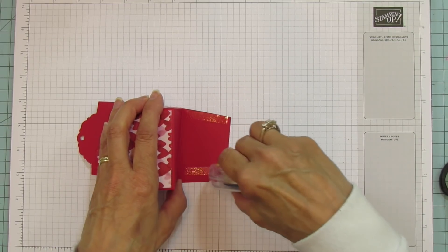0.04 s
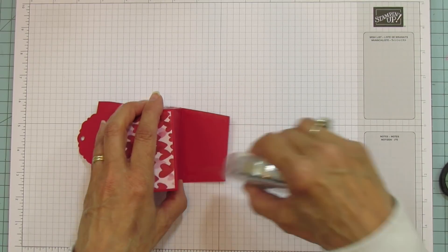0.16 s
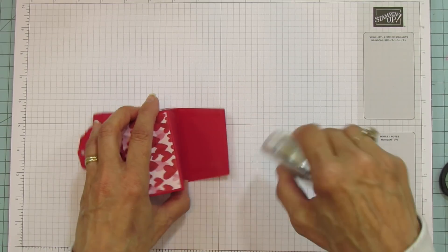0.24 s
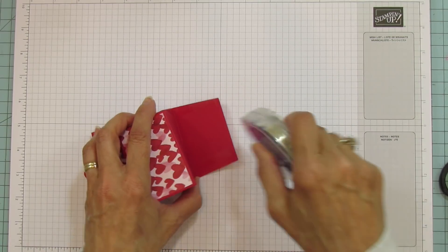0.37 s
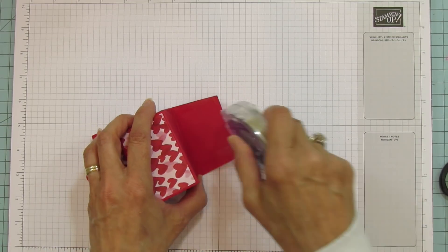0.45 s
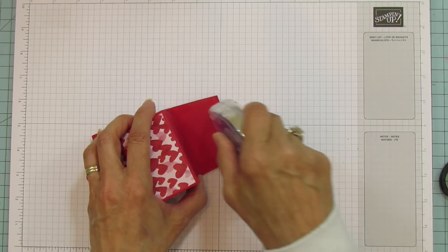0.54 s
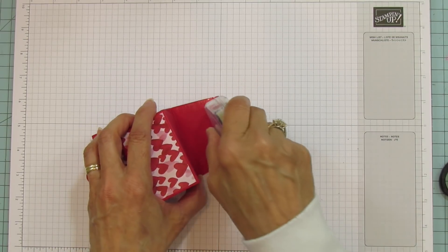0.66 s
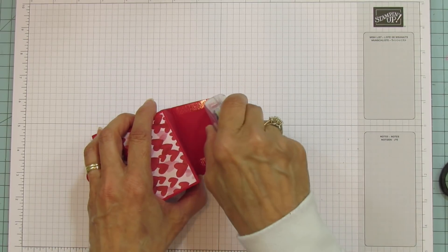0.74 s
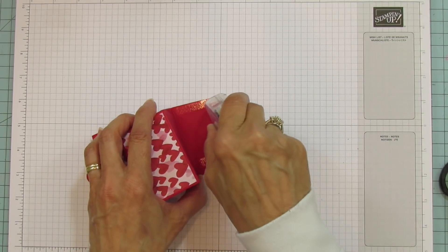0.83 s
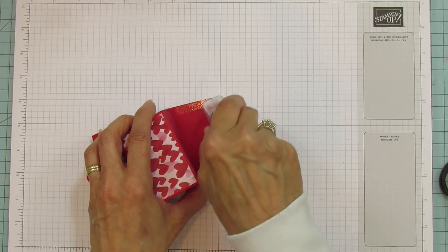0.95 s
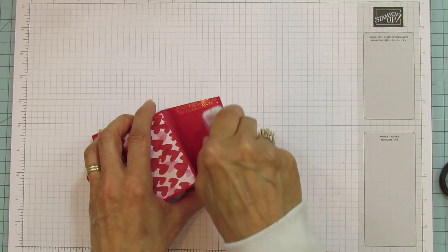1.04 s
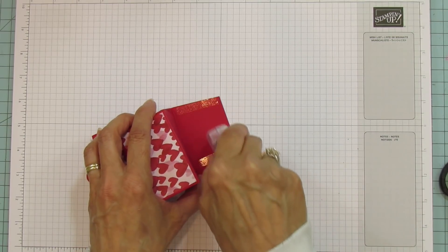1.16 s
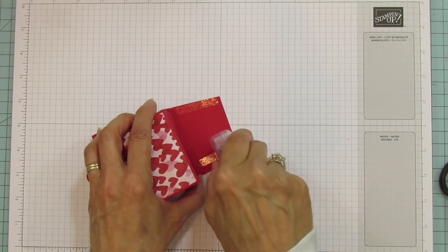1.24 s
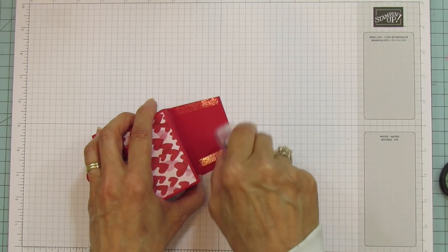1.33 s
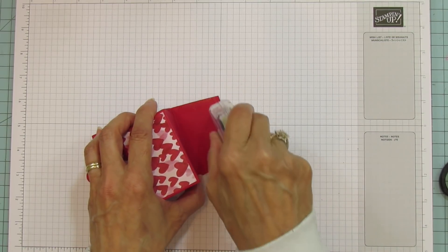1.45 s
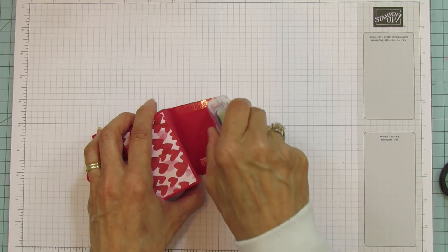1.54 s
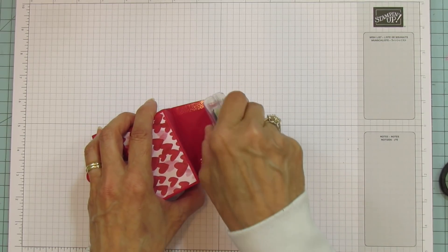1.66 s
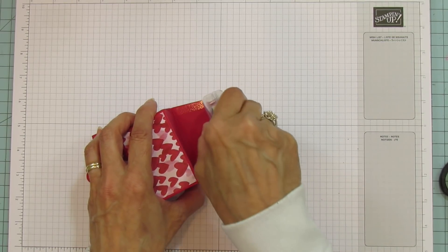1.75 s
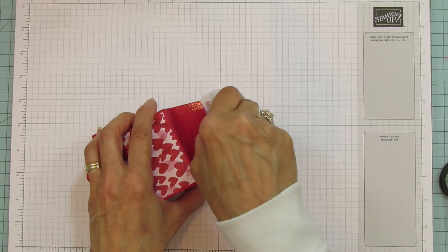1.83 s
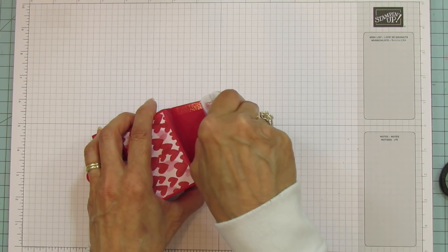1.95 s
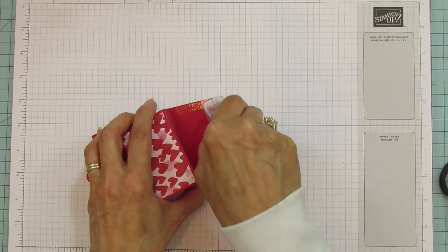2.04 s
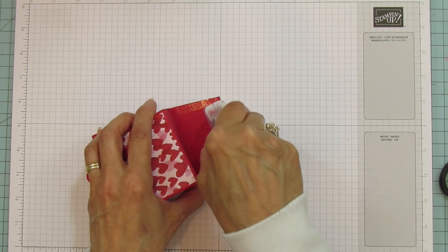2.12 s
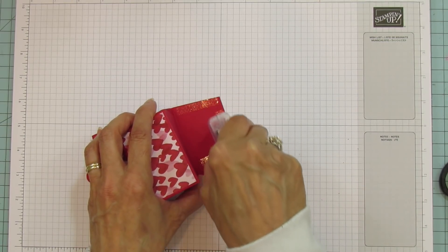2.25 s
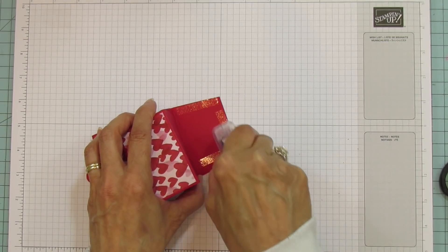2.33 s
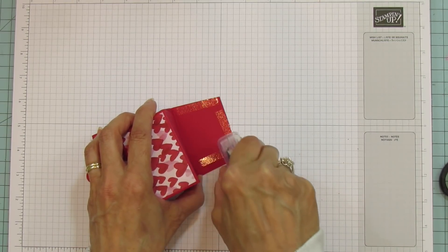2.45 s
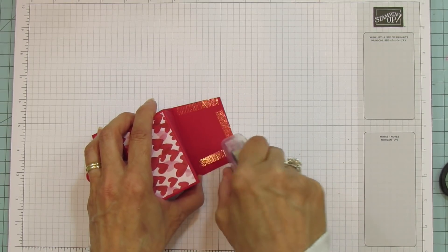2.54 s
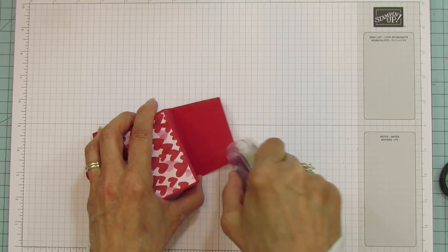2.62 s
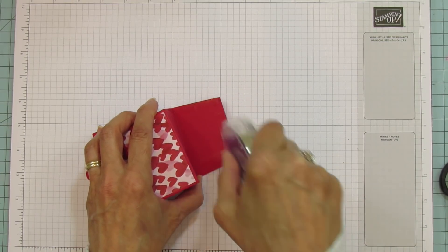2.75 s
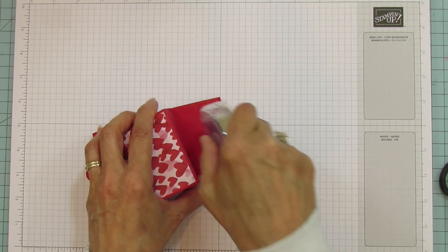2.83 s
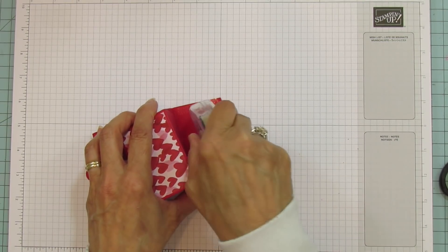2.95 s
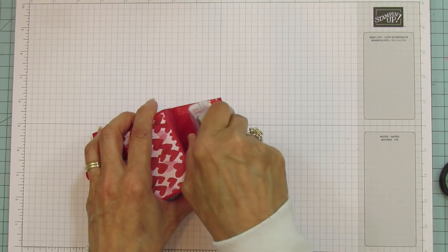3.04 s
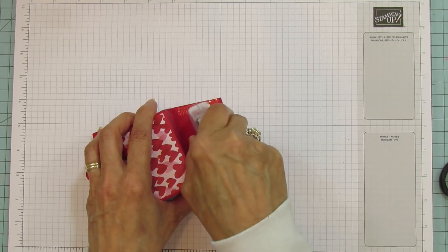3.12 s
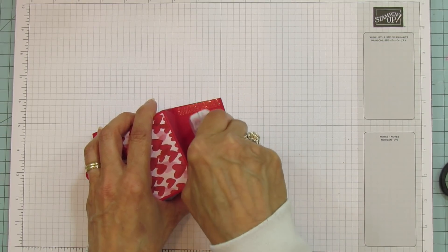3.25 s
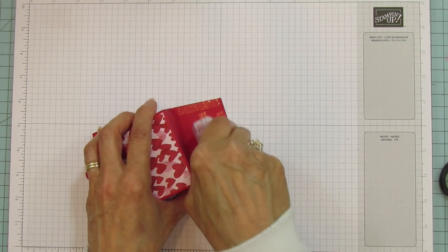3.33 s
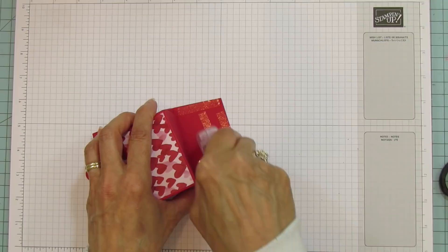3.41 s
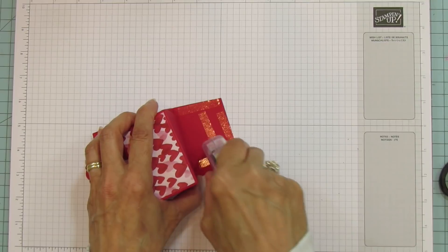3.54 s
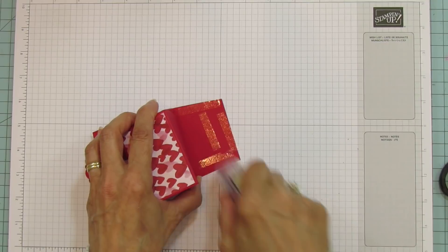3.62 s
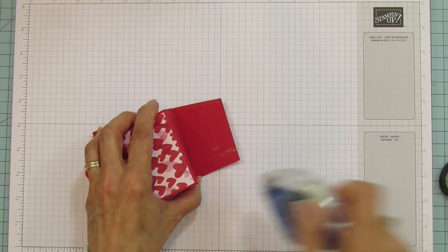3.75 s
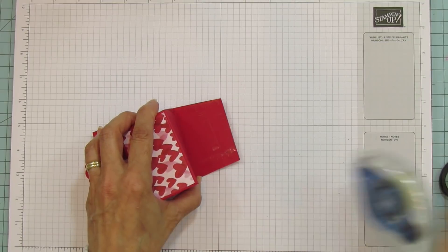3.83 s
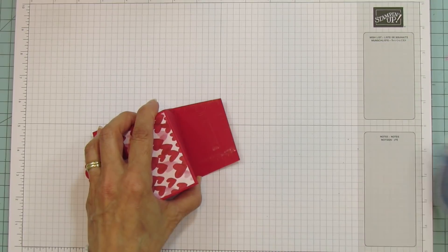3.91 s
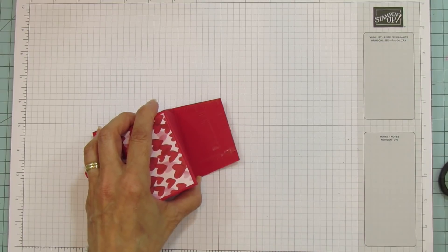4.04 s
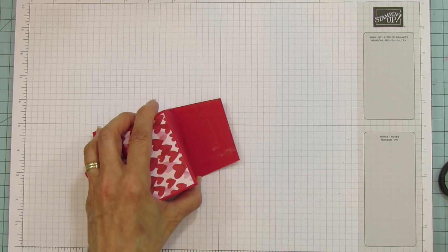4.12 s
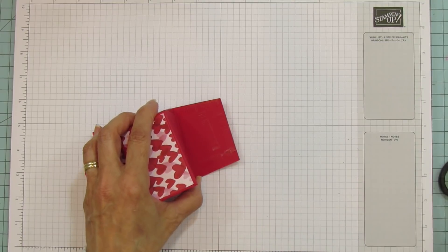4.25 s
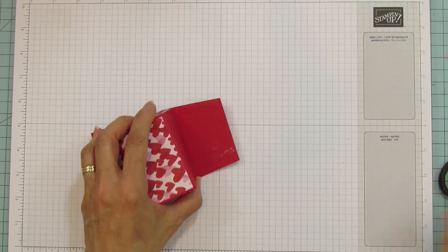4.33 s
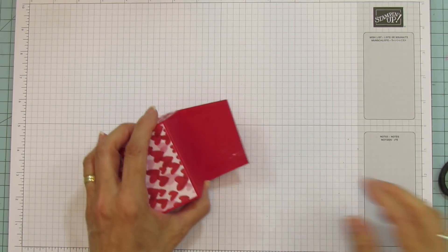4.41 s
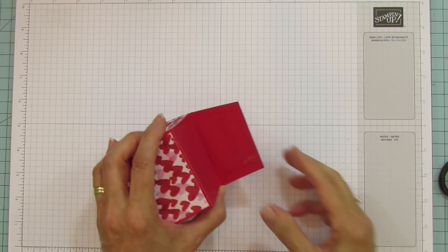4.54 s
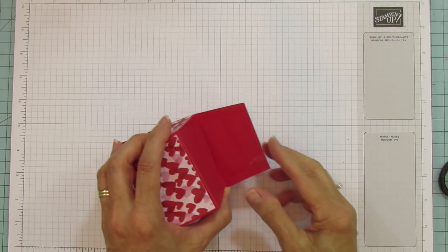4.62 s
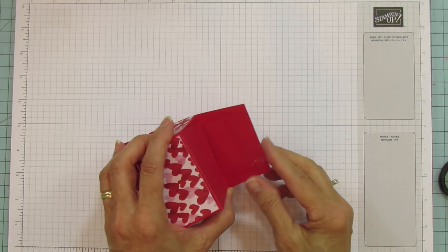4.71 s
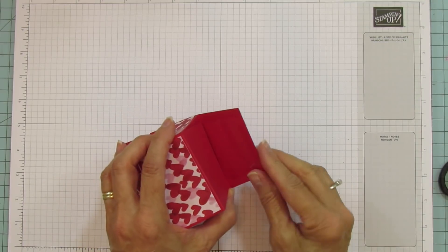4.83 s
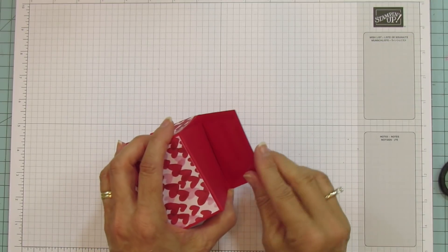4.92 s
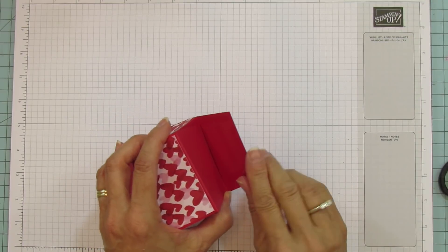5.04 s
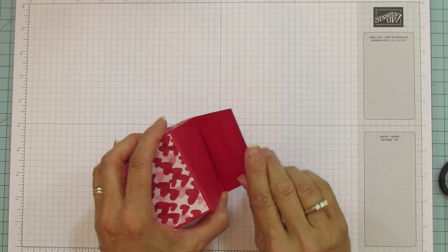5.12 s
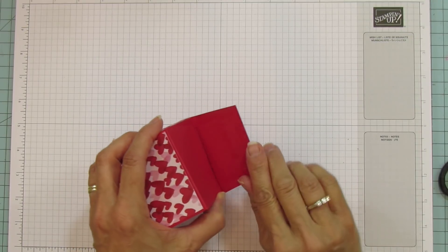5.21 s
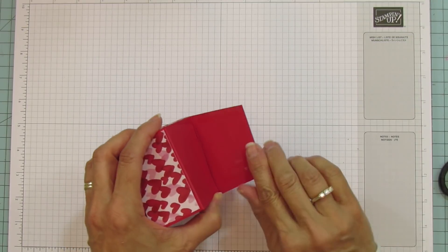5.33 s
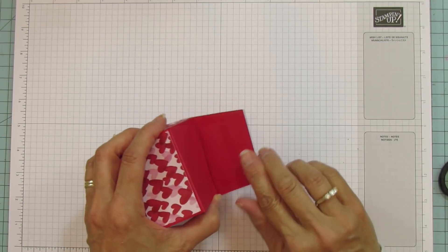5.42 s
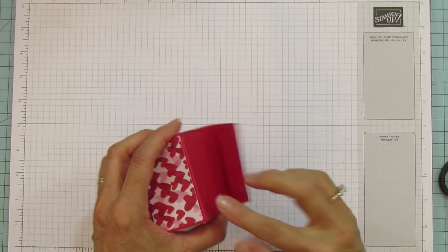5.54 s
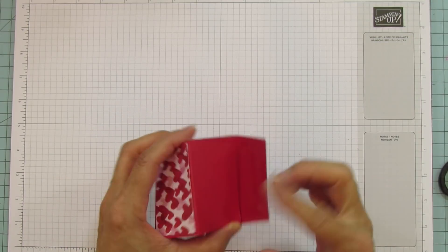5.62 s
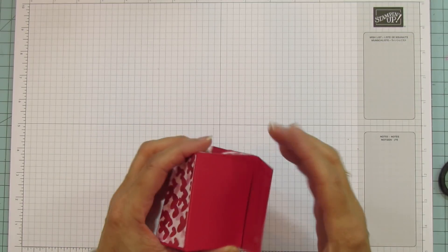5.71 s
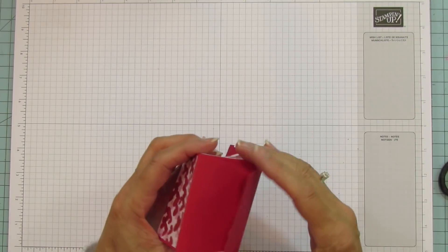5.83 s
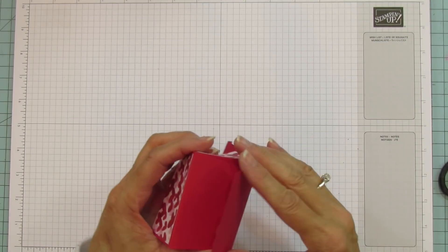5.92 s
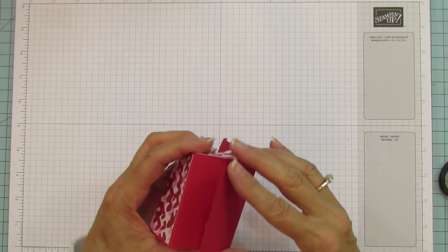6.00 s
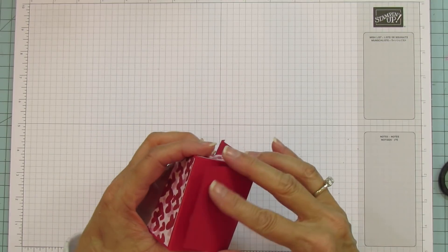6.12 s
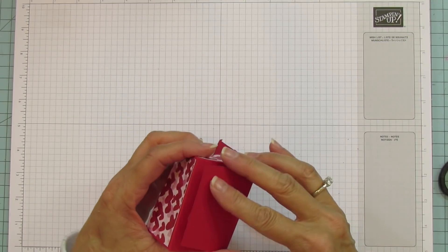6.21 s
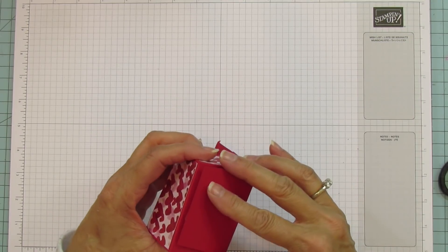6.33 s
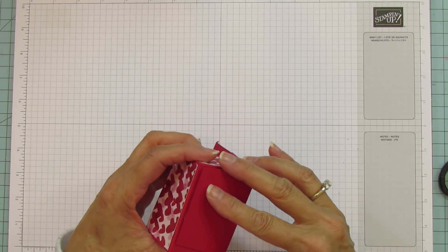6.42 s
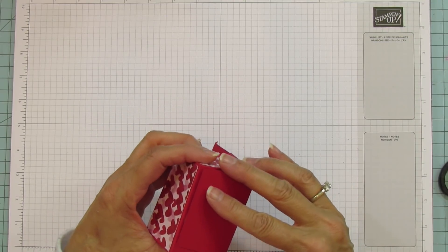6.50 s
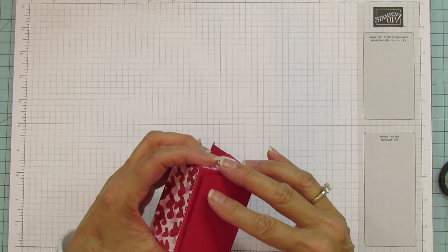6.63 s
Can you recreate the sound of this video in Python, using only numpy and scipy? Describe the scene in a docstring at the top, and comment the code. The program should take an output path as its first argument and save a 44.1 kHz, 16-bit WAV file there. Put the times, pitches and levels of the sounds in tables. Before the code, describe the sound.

Close above a craft table in a small room, a plastic tape runner slides, taps the card and ticks lightly as it rolls in short strokes. It is put down with a sharp, hard clatter that rattles briefly. Then fingers brush stiff card, which pops, flutters and creaks as it is folded and pressed. Steady wide hiss with a faint hollow hum lies behind.

```python
"""A plastic tape runner lays glue on a cardstock flap under a camera in a small room: its head knocks on the
card, its case ticks as it rolls, then it drops and clatters to rest (coloured noise bursts, case modes).
The flap is folded and pressed with snaps and rustles (bursts, trains of fibre slips through filters).
Landings thud on the table (decaying modes); steady wide hiss and two narrow bands lie behind (noise)."""
import sys
import numpy as np
from scipy import signal
from scipy.fft import rfft, irfft
from scipy.io import wavfile
from scipy.ndimage import uniform_filter1d, map_coordinates

SR = 44100
rng = np.random.default_rng(int(sys.argv[2]) if len(sys.argv) > 2 else 0)


def int16_out(signal):
    """Quantize to a 16-bit WAV file."""
    q = np.round(np.clip(np.atleast_2d(signal).T, -1, 1) * 32767)
    wavfile.write(sys.argv[1], SR, q.astype(np.int16))


N = 294011

# runner head set down on card and table: t/s, level/dB, bass/dB, ring f/Hz
TAPS = [(.468, 7.5, 2.5, 915), (.9303, -3.5, 0, 2510), (.9922, 0.5, 9, 2850), (1.03, 2, 9, 910)]
# spectrum of a tap: f/Hz, level/dB
TAP_COLOUR = [(80, -41), (220, -24), (350, -19), (450, -5), (540, 0.5), (700, -8.5), (1000, -13.5),
              (1500, -13.5), (2900, -20), (4500, -27.5), (9000, -32), (14000, -38)]
TAP_SCUFF_S, TAP_TREBLE_DB, TAP_RING_DB = 0.00096, 2, 8.5

# runner ticks, dull from the case, bright where the tape snaps off: t/s, level/dB, treble/dB, ring f/Hz
CLICKS = [(.763, -17.5, -5, 1930), (1.522, -15, -2, 3320), (2.047, -20, -4, 2000), (2.1133, -5.5, 2.5, 825),
          (2.358, -13.5, 11.5, 3060), (2.436, -14, 9, 3000), (2.45, -3.5, 11.5, 7100),
          (2.642, -12, 4.5, 1350), (2.6762, -2, 1, 1100), (3.001, -15.5, -10, 525), (3.045, -15, -11, 1940),
          (3.21, -18, -13, 2250), (3.492, -10, -14, 2050), (3.654, -9, 5, 525), (3.6705, -3, 10, 2050),
          (3.765, -13, -10, 2660), (3.85, -15, -4.5, 3000)]
# spectrum of a tick: f/Hz, level/dB
CLICK_COLOUR = [(100, -19.5), (300, -12), (550, -3), (1000, -7), (1700, -5), (2400, -2), (3200, -6.5),
                (4200, -13), (6500, -16), (9000, -23.5), (12500, -13.5), (15000, -22)]
# scuff and bass at 0 dB treble; a brighter tick is thinner and tears for longer
CLICK_SCUFF_0_S, CLICK_BASS_0_DB, CLICK_RING_DB = 0.0014, 2.5, 10
CLICK_BASS_LOSS_DB_PER_DB, PEEL_STRETCH_DB_PER_DB = 0.5, 0.13
# a faint burst of the same tone ahead of each tick softens its onset; level re tick
LEAD_IN_S, LEAD_IN_DB = .004, -16
# the tape squeaks once as the runner lifts off:
# t/s, level/dB, bass/dB, treble/dB, scuff time/s, ring f/Hz, ring/dB
SQUEAK = (.1712, -4.5, 0, 3.5, .0028, 3180, 15)

# the runner's spools turn: start t/s, end t/s, level/dB
ROLLS = [(.738, 1.398, -71), (1.978, 2.078, -66.5), (2.281, 2.475, -60.5), (2.599, 2.71, -61.5),
         (2.986, 3.34, -70.5), (3.363, 3.54, -59), (3.578, 3.73, -58.5)]
# spools whirr and the case hums along; levels re roll
SPOOL_HZ, SPOOL_HISS_DB, HOLLOW_HZ, HOLLOW_DB = 2030, -7, 540, -1.5
# faint ticks while rolling; mean level re roll
GEAR_TICKS_PER_S, GEAR_TICK_DB, GEAR_SPREAD_DB, GEAR_TREBLE_DB = 16, 41.5, 1.5, -6

# dropped runner bounces and tips over: t/s, level/dB, bass/dB, treble/dB, ring f/Hz
CLATTER = [(3.9562, 8.5, 11.5, -17, 1100), (3.9584, 15, 12, 1.5, 1464), (3.985, 9, -5.5, -6, 1530),
           (3.993, 16, 2.5, 10.5, 910), (4.0342, 16.5, -9, 2, 1520), (4.0443, 18, -4.5, -6, 1600),
           (4.0559, 12.5, -12.5, 1, 2280), (4.074, 20.5, -2, -1, 1930), (4.0857, 13.5, -11, 10, 5000),
           (4.3138, 7, -6.5, -10, 1097), (4.3196, 7.5, -6, -4.5, 2340)]
# spectrum of a clatter blow: f/Hz, level/dB
CLATTER_COLOUR = [(50, -40), (90, -24), (130, -14), (250, -10.5), (370, -4.5), (520, -0.5), (900, 0),
                  (1200, -2), (1500, -2.5), (1900, -2), (2600, -3), (4000, -8), (5200, -11.5), (8500, -14),
                  (12500, -16.5), (15000, -21.5)]
# scuff at 0 dB bass: a flat, bassy blow is brief, a thin, glancing one scrapes longer
CLATTER_SCUFF_0_S, CLATTER_RING_DB, GLANCE_DB_PER_DB = .0012, 10.5, 0.54
# chatter as it settles on a side: first t/s, first level/dB, bass/dB, time between rebounds/s
CHATTERS = [(4.0887, 20.5, -5, .012), (4.182, 8, -19, .009), (4.343, -1.5, 3.5, .023)]
CHATTER_FALL_DB, CHATTER_SCUFF_S, CHATTER_TREBLE_DB = 5, 0.0034, -3
CHATTER_RING_HZ, CHATTER_RING_DB = 590, 7.5
# ringing of the dropped case: f/Hz, level/dB, t60/s
CASE_MODES = [(530, -6, 0.14), (884, -15.5, .25), (884, -18, 0.24), (1000, -8, 0.17), (1082, -8, 0.19),
              (1472, -6, 0.22), (1598, -7, 0.2), (1780, -12, 0.43), (1966, -11.5, .3), (1900, -8.5, 0.23),
              (2048, -6, 0.22), (2080, -3.5, 0.083), (2310, -8.5, 0.22), (2504, -12.5, 0.426),
              (2670, -7.5, 0.25)]

# card box buckles, edges flick past each other: t/s, level/dB, crispness/dB, ring f/Hz
SNAPS = [(5.2351, -3.5, -7, 6500), (5.4438, -7, -4, 850), (5.4854, 3.5, -1.5, 970), (5.6416, -1, 1.5, 2250),
         (5.8616, -10, 2.5, 1144), (6.0655, -8.5, 3, 1110), (6.163, -0.5, 6, 4500), (6.168, -2, 3, 845)]
# spectrum of a snap: f/Hz, level/dB
SNAP_COLOUR = [(100, -40), (300, -16.5), (550, -10.5), (850, -2), (1150, 0.5), (1800, -11), (3000, -9),
               (4200, -12.5), (6500, -17), (10000, -15), (13000, -16.5), (15000, -25)]
SNAP_SCUFF_S, SNAP_RING_DB, SNAP_BASS_DB_PER_CRISP_DB = 0.0018, 9.5, 0.54
# the flap springs over its crease and flutters to rest
FLAP_S, FLAP_DB, FLAP_GAP_S, FLAP_FALL_DB = 5.4888, 10, 0.0091, 5
FLAP_BASS_DB, FLAP_TREBLE_DB, FLAP_SCUFF_S, FLAP_RING_HZ, FLAP_RING_DB = 0.5, -20, 0.0016, 880, 7.5
# the crease creaks in a few dry slips
CREAK_S, CREAK_DB, CREAK_GAP_S, CREAK_FALL_DB = 5.5885, -7.5, .0125, .3
CREAK_BASS_DB, CREAK_TREBLE_DB, CREAK_SCUFF_S, CREAK_RING_HZ, CREAK_RING_DB = -9, -3, .004, 3020, 11.5

# card and runner slide on the table: start t/s, end t/s, level/dB, rub resonance f/Hz
SLIDES = [(.059, .15, -58.5, 1980), (.15, 0.292, -47.5, 1350), (.239, 0.388, -52.5, 2700),
          (0.279, 0.517, -56, 1110), (4.405, 4.599, -56.5, 2260)]
SLIDE_HISS_DB = -66.5
# fingers brush over the card: start t/s, end t/s, level/dB
BRUSHES = [(3.707, 3.9, -61.5), (5.338, 5.478, -65.5), (5.478, 5.56, -50.5), (5.73, 5.789, -56),
           (5.766, 6.004, -61), (6.008, 6.056, -52), (6.059, 6.4, -57.5), (6.455, 6.686, -65.5)]
# hiss re brush at the reference length, and its gain per halving of length
BOX_HZ, BRUSH_REF_S, BRUSH_HISS_DB, BRISK_DB_PER_HALVING = 1160, 0.11, 0.5, 2
# spectrum of fibre hiss: f/Hz, level/dB
FIBRE_HISS = [(1500, -33), (3000, 2), (5000, 0), (8000, -0.5), (12500, 1), (15000, -7)]

# weight landing on the table, from hands and dropped runner: t/s, level/dB
BUMPS = [(1.283, -64.5), (3.006, -66), (3.049, -61.5), (3.9571, -33.5), (4.312, -51), (4.701, -65.5)]
# low ringing of the table top: f/Hz, level/dB, t60/s
TABLE_MODES = [(119.3, -7.5, 0.27), (126.8, -1.5, 0.19), (160.6, 2.5, 0.3), (244, 5, 0.2), (362, 2.5, 0.14),
               (400, 3.5, 0.23)]

# spectrum of background hiss and room air: f/Hz, level/dB
FLOOR = [(25, -18), (110, -9), (200, -10), (380, -5), (650, -6), (1000, -7.5), (1600, -10.5), (3200, -14.5),
         (4600, -17), (7400, -17.5), (9000, -21.5), (13500, -26), (15500, -40)]
FLOOR_MID_DB = -58
# stereo width of the background: f/Hz, side re middle/dB
FLOOR_WIDTH = [(60, 0), (130, 9), (290, 9.5), (640, 5.5), (1410, 3), (3100, 1), (6820, 0), (15000, 0)]
# narrow background bands: f/Hz, width/Hz, level/dB
DRONES = [(521.2, 19, -64.5), (7500, 230, -71.5)]

# room decay before each source's linger factor: f/Hz, t60/s
ROOM_T60 = [(100, 0.23), (500, 0.32), (2000, 0.23), (5000, 0.32), (12000, 0.21)]
# likeness of the left and right tails: f/Hz, likeness 0-1
ROOM_LIKENESS = [(100, 1), (1000, 0.78), (2500, 0.55), (5000, .3), (12000, 0.05)]
# nearby wall and ceiling, before each source's echo gain: delay/s, level/dB
ECHOES = [(.0085, -13.5), (0.01, -5)]

# narrow dips in the output spectrum: f/Hz, full width at 1/e of the dB depth/Hz, level/dB
BAND_DIPS = [(3950, 260, -14), (7930, 170, -20)]
# soft top end of the output: f/Hz, level/dB
TOP_END = [(13000, -0.5), (14200, -5.5), (15200, -18), (16000, -28)]
BAND_EDGE_HZ = 16200

BLOW_FFT_SAMPLES = 4096
BLOW_HZ = np.fft.rfftfreq(BLOW_FFT_SAMPLES, 1 / SR)


def runner_taps():
    """The head lands with a hollow knock: a short burst with one resonance, then near reflections."""
    strikes = [(s, db, bass, TAP_TREBLE_DB, TAP_SCUFF_S, hz, TAP_RING_DB) for s, db, bass, hz in TAPS]
    return room(blows(strikes, TAP_COLOUR), wet_db=-3, echo_db=1, pan_db=-0.8, linger=0.76)


def runner_clicks():
    """Thin ticks of plastic and tape, their onsets softened by faint lead-ins, and one squeak."""
    ticks = []
    for s, db, treble, hz in CLICKS + gear_ticks():
        bass = CLICK_BASS_0_DB - CLICK_BASS_LOSS_DB_PER_DB * treble
        scuff_s = CLICK_SCUFF_0_S * amp(PEEL_STRETCH_DB_PER_DB * treble)
        ticks.append((s, db, bass, treble, scuff_s, hz, CLICK_RING_DB))
    lead_ins = [(s - LEAD_IN_S, db + LEAD_IN_DB, *tone) for s, db, *tone in ticks]
    strikes = ticks + lead_ins + [SQUEAK]
    return room(blows(strikes, CLICK_COLOUR), wet_db=-1.5, echo_db=-7.0, pan_db=-.2)


def gear_ticks(count=24):
    """Faint ticks at chance moments while the spools turn: (t/s, level/dB, treble/dB, ring f/Hz)."""
    ticks = []
    for start, end, db in ROLLS:
        times = start + np.cumsum(rng.exponential(1, count)) / GEAR_TICKS_PER_S
        levels = db + GEAR_TICK_DB + GEAR_SPREAD_DB * rng.standard_normal(count)
        ticks += [(s, level, GEAR_TREBLE_DB, SPOOL_HZ) for s, level in zip(times, levels) if s < end]
    return ticks


def runner_drop(ring_db=-51):
    """Each contact is a hard blow that also sets the hollow case ringing in its modes."""
    hits = blows(tumble(), CLATTER_COLOUR)
    t = np.arange(SR // 2) / SR
    ring = sum(amp(db - 60 * t / t60) * np.cos(2 * np.pi * hz * t) for hz, db, t60 in CASE_MODES)
    ringing = hits + amp(ring_db) * signal.fftconvolve(hits, ring)[:N]
    return room(ringing, wet_db=-2.5, echo_db=-12, pan_db=1.2, lag_s=.000017)


def tumble():
    """Contacts of the dropped runner: single bounces and runs of ever weaker chatter."""
    contacts = []
    for s, db, bass, treble, hz in CLATTER:
        scuff_s = CLATTER_SCUFF_0_S * amp(-GLANCE_DB_PER_DB * bass)
        contacts.append((s, db, bass, treble, scuff_s, hz, CLATTER_RING_DB))
    for start, first_db, bass, gap_s in CHATTERS:
        tone = (bass, CHATTER_TREBLE_DB, CHATTER_SCUFF_S, CHATTER_RING_HZ, CHATTER_RING_DB)
        contacts += [(s, db, *tone) for s, db in rebounds(start, first_db, gap_s, CHATTER_FALL_DB, count=5)]
    return contacts


def card_snaps():
    """Stiff card pops against the hollow of the box; the flap flutters and its crease creaks."""
    snaps = [(s, db, SNAP_BASS_DB_PER_CRISP_DB * crisp, crisp, SNAP_SCUFF_S, hz, SNAP_RING_DB)
             for s, db, crisp, hz in SNAPS]
    flap_tone = (FLAP_BASS_DB, FLAP_TREBLE_DB, FLAP_SCUFF_S, FLAP_RING_HZ, FLAP_RING_DB)
    flutter = [(s, db, *flap_tone) for s, db in rebounds(FLAP_S, FLAP_DB, FLAP_GAP_S, FLAP_FALL_DB, count=4)]
    creak_tone = (CREAK_BASS_DB, CREAK_TREBLE_DB, CREAK_SCUFF_S, CREAK_RING_HZ, CREAK_RING_DB)
    creak = [(s, db, *creak_tone)
             for s, db in rebounds(CREAK_S, CREAK_DB, CREAK_GAP_S, CREAK_FALL_DB, count=3)]
    return room(blows(snaps + flutter + creak, SNAP_COLOUR), wet_db=-4, echo_db=-6.0, pan_db=-.2, linger=0.86)


def rubbing(resonance_q=1.94):
    """Each stroke swells and fades; its slips sound a broad resonance and a fibre hiss."""
    out = np.zeros(N)
    for start, end, rub_db, hz, hiss_db in strokes():
        n = round((end - start) * SR)
        grains = slips(n, per_s=9000, spread_db=2.5)
        rub = signal.lfilter(*signal.iirpeak(hz, resonance_q, SR), grains)
        rub = shaped(rub, [(100, -32), (450, 9.5), (3200, -4.0), (7000, -5.5)])
        hiss = shaped(grains, FIBRE_HISS)
        stroke = amp(rub_db) * unit(rub) + amp(hiss_db) * unit(hiss)
        add(out, start, stroke * signal.windows.tukey(n, .6))
    return room(out, wet_db=-3.0, echo_db=-12, pan_db=-1.0)


def strokes():
    """All that rolls, slides or brushes: (start t/s, end t/s, rub/dB, resonance f/Hz, hiss/dB)."""
    rows = []
    for start, end, db in ROLLS:
        for hz, part_db in [(SPOOL_HZ, 0), (HOLLOW_HZ, HOLLOW_DB)]:
            rows.append((start, end, db + part_db, hz, db + part_db + SPOOL_HISS_DB))
    rows += [(*slide, SLIDE_HISS_DB) for slide in SLIDES]
    for start, end, db in BRUSHES:
        brisk_db = BRISK_DB_PER_HALVING * np.log2(BRUSH_REF_S / (end - start))
        rows.append((start, end, db, BOX_HZ, db + BRUSH_HISS_DB + brisk_db))
    return rows


def slips(n, per_s, spread_db, clump_db=3.0, clump_s=0.0054):
    """Fibres catch and let go: a random train of small and large clicks that come in clumps."""
    size = amp(spread_db * np.minimum(rng.exponential(1, n), 4))
    knots = rng.standard_normal(256)
    grip = amp(clump_db * np.interp(np.arange(n) / SR / clump_s, np.arange(len(knots)), knots))
    kicks = rng.standard_normal(n) * (rng.random(n) < per_s / SR)
    return unit(grip * size * kicks)


def table_thuds(contact_s=0.00028):
    """The table top answers each landing with a low thud of decaying modes."""
    out, t = np.zeros(N), np.arange(SR // 2) / SR
    thud = sum(amp(db - 60 * t / t60) * np.sin(2 * np.pi * hz * t) for hz, db, t60 in TABLE_MODES)
    onset = 1 - np.exp(-t / contact_s)
    for s, db in BUMPS:
        add(out, s, amp(db) * thud * onset)
    # the thuds carry little deep bass
    out = signal.sosfilt(signal.butter(3, 105, "highpass", fs=SR, output="sos"), out)
    return room(out, wet_db=-6.0, echo_db=-26, pan_db=-4.5)


def background():
    """Steady, wide hiss and room air, with a central hollow drone and thin high band."""
    mid, side = shaped(rng.standard_normal((2, N)), FLOOR)
    mid, side = unit(mid), shaped(unit(side), FLOOR_WIDTH)
    air = amp(FLOOR_MID_DB) * np.array([mid + side, mid - side])
    for hz, width_hz, db in DRONES:
        band = signal.lfilter(*signal.iirpeak(hz, hz / width_hz, SR), rng.standard_normal(N))
        air += amp(db) * unit(band)
    return air


def blow(colour, level_db, bass_db, treble_db, scuff_s, ring_hz, ring_db, ring_width=0.094, rise=0.34):
    """A contact: a brief scuff of micro-impacts, coloured by the struck thing and the patch that rings."""
    t = np.arange(BLOW_FFT_SAMPLES) / SR / scuff_s  # in scuff times, as is rise
    force = rfft(rng.standard_normal(BLOW_FFT_SAMPLES) * np.exp(-t) * (1 - np.exp(-t / rise)))
    # flatten the broad spectrum, keep its fine grain
    force = force / np.sqrt(uniform_filter1d(abs(force) ** 2, size=40) + 1e-9)
    tilt_db = read([(750, bass_db), (1400, 0), (3200, 0), (7500, treble_db)], BLOW_HZ)
    # ring_width is a fraction of ring_hz
    patch = 1 + (amp(ring_db) - 1) / (1 + (2 * (BLOW_HZ / ring_hz - 1) / ring_width) ** 2)
    body = causal(amp(level_db + read(colour, BLOW_HZ) + tilt_db) * patch)
    return irfft(force * body)[:BLOW_FFT_SAMPLES // 2]


def blows(rows, colour):
    """Plays a table of contacts on one object."""
    out = np.zeros(N)
    for s, *strike in rows:
        add(out, s, blow(colour, *strike))
    return out


def rebounds(s, level_db, gap_s, fall_db, count):
    """Evenly spaced contacts, each weaker than the last: (t/s, level/dB)."""
    return [(s + k * gap_s, level_db - k * fall_db) for k in range(count)]


def room(x, wet_db, echo_db, pan_db, lag_s=0, linger=1, echo_top_hz=1100):
    """Direct sound, dull near reflections and a diffuse tail decaying by band; right side lag_s later."""
    hz, t, z = signal.stft(rng.standard_normal((2, SR * 3 // 4)), SR, nperseg=256)
    decay = amp(-60 * t / linger / read(ROOM_T60, hz)[:, None])
    tail = signal.istft(z * decay, SR, nperseg=256)[1]
    tail = tail * np.clip(np.arange(tail.shape[1]) / SR / 0.0016, 0, 1)  # 1.6 ms build-up
    response = amp(wet_db) * pair(tail / np.linalg.norm(tail[0]), ROOM_LIKENESS)
    echoes = np.zeros(tail.shape[1])
    for delay_s, db in ECHOES:
        echoes[round(delay_s * SR)] += amp(db + echo_db)
    response += signal.lfilter(*signal.butter(1, echo_top_hz, fs=SR), echoes)
    response[:, 0] += 1  # direct sound
    left, right = signal.fftconvolve(x[None], response, axes=1)[:, :N]
    right = map_coordinates(right, [np.arange(N) - lag_s * SR], order=3)
    return np.array([left * amp(pan_db / 2), right * amp(-pan_db / 2)])


def pair(two, likeness):
    """Blends two unrelated signals into left and right, alike by band."""
    n = two.shape[-1]
    same = np.clip(read(likeness, np.fft.rfftfreq(n, 1 / SR)), 0, 1)
    mid, side = rfft(two) * np.sqrt([(1 + same) / 2, (1 - same) / 2])
    return irfft(np.array([mid + side, mid - side]), n)


def causal(gain):
    """Minimum-phase spectrum: the promptest response that has this gain."""
    log_gain = np.log(np.maximum(gain, 1e-6))
    circle = np.concatenate([log_gain, log_gain[-2:0:-1]])
    return np.exp(np.conj(signal.hilbert(circle)))[:len(gain)]


def shaped(x, points):
    """Filters by a (f/Hz, level/dB) spectrum."""
    n = x.shape[-1]
    return irfft(rfft(x) * amp(read(points, np.fft.rfftfreq(n, 1 / SR))), n)


def read(points, hz):
    """Joins (f/Hz, value) points on a log-frequency axis."""
    f, value = np.transpose(points)
    return np.interp(np.log(hz + 1), np.log(f + 1), value)


def add(mix, s, sound):
    """Adds a sound into the mix at time s."""
    part = mix[max(round(s * SR), 0):][:len(sound)]
    part += sound[:len(part)]


def amp(db):
    """Decibels to gain."""
    return 10 ** (np.asarray(db) / 20)


def unit(x):
    """Scales to rms 1."""
    return x / np.sqrt(np.mean(x ** 2) + 1e-20)


def scene():
    """Sums the runner, card, table and background."""
    runner = runner_taps() + runner_clicks() + runner_drop()
    return runner + card_snaps() + rubbing() + table_thuds() + background()


def record(dry):
    hz = np.fft.rfftfreq(N, 1 / SR)
    dips_db = sum(db * np.exp(-(2 * (hz - f) / width_hz) ** 2) for f, width_hz, db in BAND_DIPS)
    colour_db = read(TOP_END, hz) + dips_db
    clipped = np.clip(irfft(rfft(dry) * amp(colour_db), N), -1, 1)
    lowpass = signal.firwin(255, BAND_EDGE_HZ, window=("kaiser", 9), fs=SR)
    return signal.oaconvolve(clipped, lowpass[None], "same")


dry = scene()
out = record(dry)
int16_out(out)
```